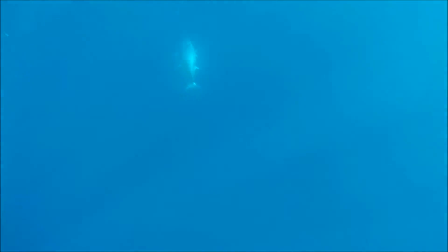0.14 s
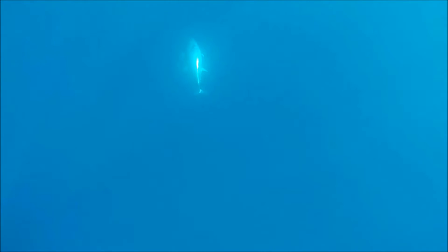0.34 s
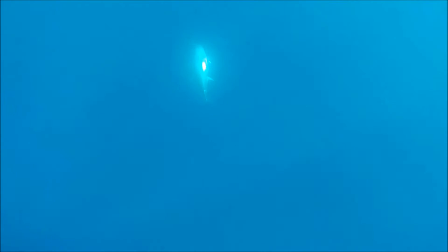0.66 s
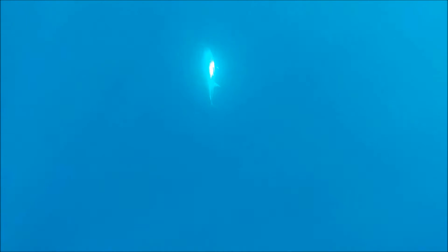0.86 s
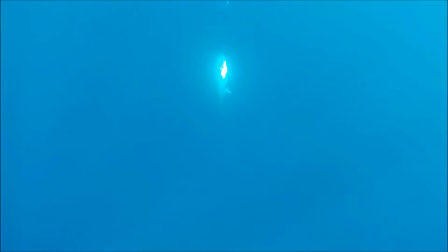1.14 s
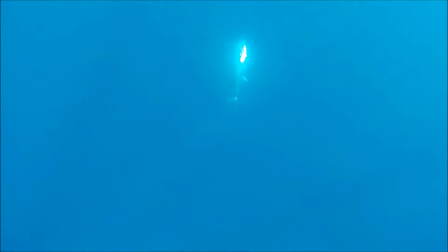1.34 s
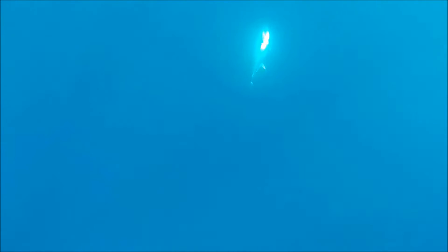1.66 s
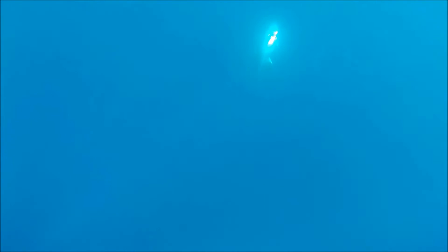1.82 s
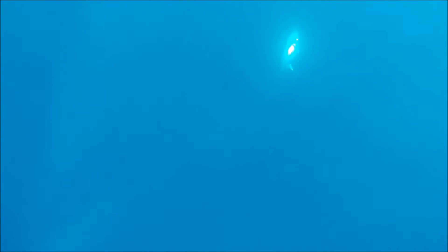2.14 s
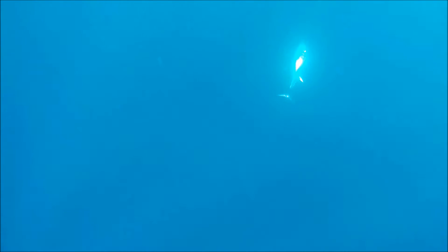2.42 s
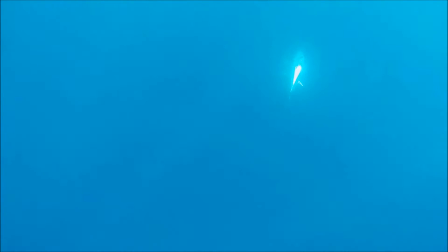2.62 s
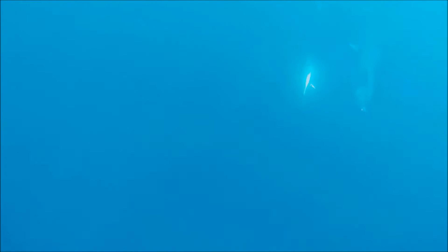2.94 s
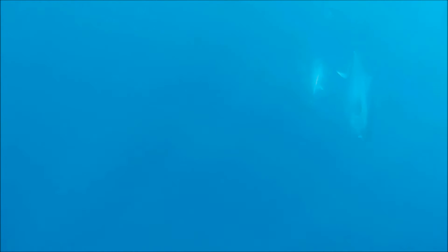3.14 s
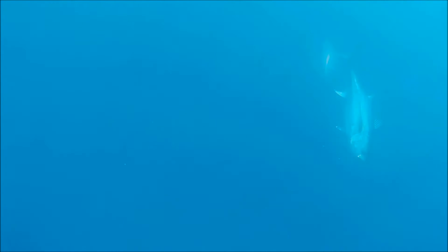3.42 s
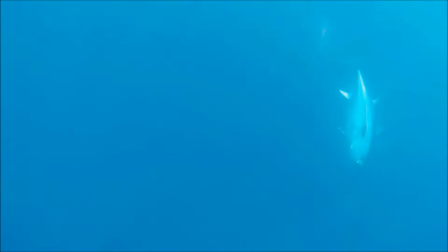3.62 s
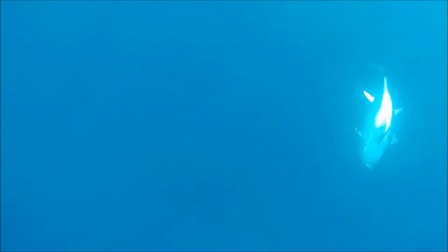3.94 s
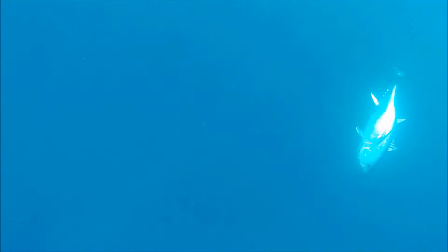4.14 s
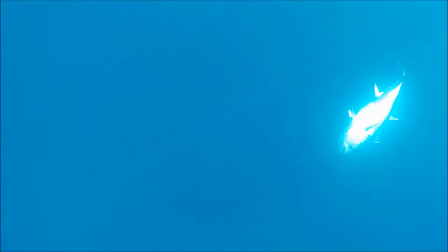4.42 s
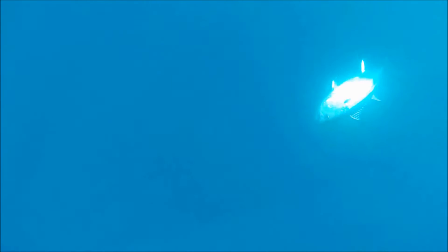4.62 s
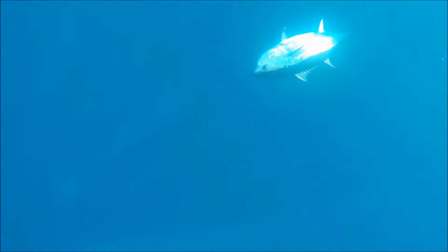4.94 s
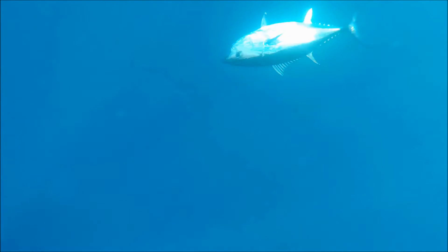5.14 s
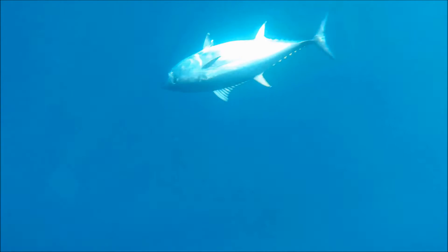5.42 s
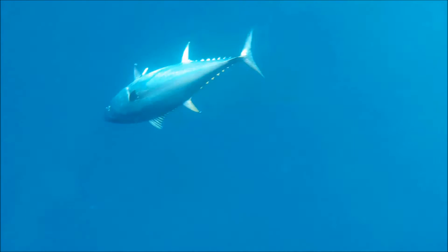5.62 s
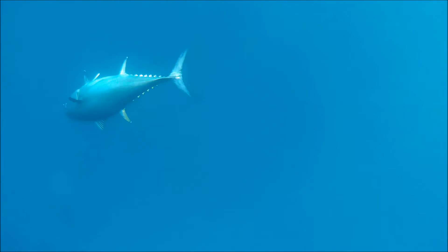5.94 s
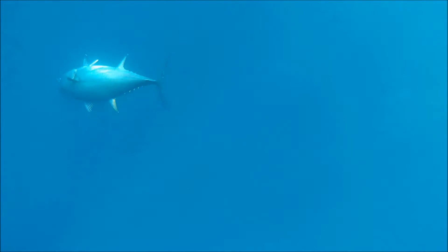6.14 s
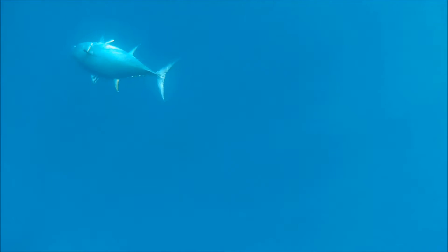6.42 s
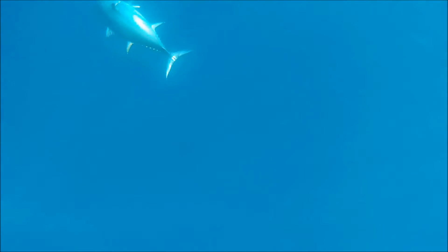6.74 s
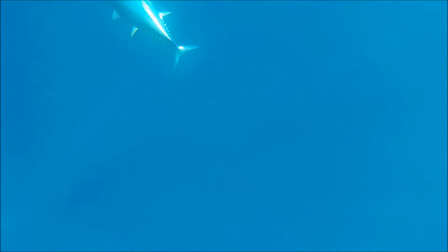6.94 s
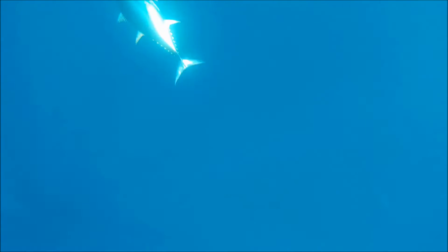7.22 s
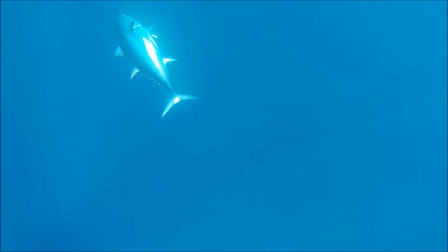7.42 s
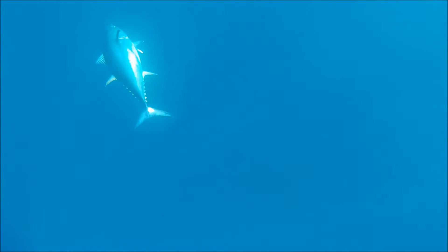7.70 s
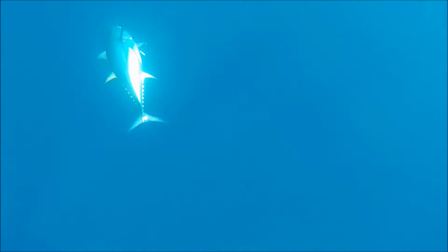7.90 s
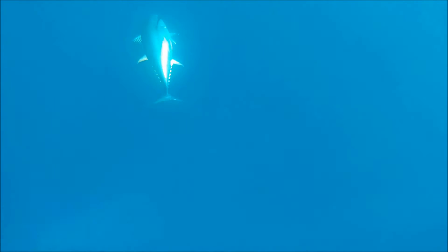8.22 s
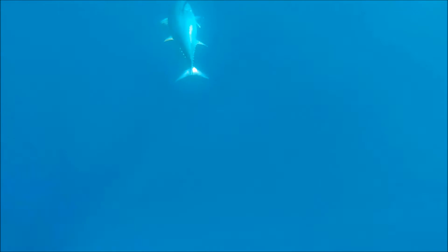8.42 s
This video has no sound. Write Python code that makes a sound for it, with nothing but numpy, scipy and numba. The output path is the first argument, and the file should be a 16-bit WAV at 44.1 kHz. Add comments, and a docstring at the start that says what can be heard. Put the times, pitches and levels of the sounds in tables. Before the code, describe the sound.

Just under the sea surface, water rumbles and sloshes softly over a faint hiss, muffled by a sealed camera housing. Droplets tick on the shell and small bubbles plop. The hiss grows a little, and a hard, dull knock strikes the housing. After a lull, the bubbles and ticks return and thicken into a burst of churning water with two more knocks.

```python
"""A sealed camera hangs just under the sea surface beside a boat; all sound comes through its housing.
Water rumbles and sloshes throughout, over microphone hiss. From 0.6 s droplets tick on the shell,
bubbles plop and glide up, and dull knocks ring the housing. The hiss is louder from 2.5 to 4 s, with
the hardest knock at 3.7 s. After a lull, bubbles and ticks return at 6.2 s and peak with the churning
water and two more knocks near 8 s."""
import sys
import numpy as np
from scipy import signal
from scipy.io import wavfile
from scipy.ndimage import uniform_filter1d
from numba import njit

SR = 44100
rng = np.random.default_rng(int(sys.argv[2]) if len(sys.argv) > 2 else 0)


def generate_wav(sig):
    """Save sig (samples, or channels by samples) to the path in sys.argv[1] as 16-bit PCM at SR."""
    pcm = np.round(np.clip(np.atleast_2d(sig).T, -1, 1) * 32767).astype(np.int16)
    wavfile.write(sys.argv[1], SR, pcm)


N = 377937

# water movement: (time [s], surge [dB], flow along the shell [dB], churn [dB])
WATER_LEVELS = [(0.0, -65.5, -65, -61.5), (0.43, -59, -64.5, -63), (0.86, -58, -60.5, -59.5),
                (1.07, -56, -60.5, -56.5), (1.81, -58, -58.5, -55), (2.03, -58.5, -62.5, -61.5),
                (2.34, -63, -61.5, -64), (2.58, -60, -58.5, -64.5), (3.1, -61.5, -62.5, -67),
                (3.79, -57, -59, -61), (4.13, -65, -64, -72), (4.84, -66, -65.5, -70),
                (5.8, -62, -66, -70.5), (6, -54, -63, -64), (6.18, -53.5, -65, -61.5),
                (6.37, -57, -55, -74), (6.54, -60, -58.5, -60.5), (6.9, -61, -57.5, -61),
                (7.23, -58, -54.5, -57), (7.57, -50.5, -51.5, -49), (7.9, -47.5, -55.5, -36.5),
                (8.04, -48.5, -55.5, -49.5), (8.28, -51.5, -53, -49), (8.57, -50, -51, -60)]
# rumble spectrum: (frequency [Hz], relative gain [dB])
RUMBLE_SPECTRUM = [(11, -28), (18, 0.5), (50, -5), (110, -10.5), (190, -10), (273, -10.5), (368, -16.5),
                   (396, -5.5), (467, -15.5), (729, -25), (1500, -31.5), (1950, -55), (3300, -120)]
# air space behind the window: (frequency [Hz], base width [Hz], gain [dB])
AIR_MODES = [(676, 302, 3.5), (950, 120, -10.5), (1577, 450, -17.5), (2175, 1170, -23), (2974, 27, -23)]
# microphone hiss: (time [s], level [dB])
HISS_LEVELS = [(0, -67.5), (2.52, -68), (2.55, -63.5), (4.04, -64.5), (4.08, -68), (8.57, -68)]
# droplets on the shell: (time [s], level [dB], own note [Hz], brightness [dB])
DROPLETS = [(0.614, -51, 2400, -9), (0.772, -47, 2600, -12), (.815, -50.5, 2700, 0.5),
            (.823, -57, 2600, 1.5), (0.911, -52, 2540, -11), (.958, -61, 4470, -3), (.977, -54, 2760, 1),
            (.984, -56, 5100, 0), (1.01, -60.5, 4900, 0), (1.173, -52, 2410, -1), (1.278, -56, 2340, -10),
            (1.481, -56.5, 3130, -12), (1.679, -51, 3420, -8), (1.905, -58, 3100, -12),
            (1.917, -58, 2800, -12), (2.069, -57, 2950, -8), (3.392, -44.5, 2820, -21),
            (3.466, -55, 2680, -3), (6.18, -59, 3300, -14), (6.387, -56, 5240, 1), (6.43, -59, 2350, -12),
            (6.46, -63, 2700, -12), (6.472, -49, 2270, -16), (6.503, -63, 2700, -12),
            (6.513, -50, 2350, -12), (6.59, -47.5, 2630, -22), (6.642, -57, 2650, -12),
            (6.716, -56, 3480, -14), (6.758, -49.5, 2830, -13), (6.79, -57, 5400, -10),
            (7.179, -59, 2850, -2), (7.273, -55, 4670, 2), (7.298, -47, 2670, 2), (7.311, -45, 4670, -9),
            (7.319, -47, 4650, -3), (7.326, -46, 2770, 1), (7.348, -39.5, 4210, -1.5),
            (7.353, -44, 7760, 0), (7.36, -42, 2750, -6.5), (7.369, -43, 2720, -1), (7.379, -56, 5300, 0),
            (7.386, -52, 4540, -1), (7.42, -50.5, 8100, 2), (7.425, -50, 5000, -2), (7.431, -53, 4670, -2),
            (7.471, -65, 6300, -10), (7.477, -55, 4540, -4), (7.484, -60, 4500, -6), (7.49, -52, 4530, -8),
            (7.508, -44, 3720, -5), (7.526, -61, 6700, -1), (7.542, -57, 4500, -8), (7.547, -53, 3400, -6),
            (7.561, -48.5, 2630, 2), (7.574, -58, 4700, -6), (7.586, -53, 3700, -6), (7.598, -52, 2800, -4),
            (7.605, -39, 2630, 3), (7.636, -53, 2230, -3), (7.647, -49, 3800, -1),
            (7.654, -37.5, 2630, 0.5), (7.667, -35.5, 3040, -12), (7.671, -36.5, 2300, -19),
            (7.7, -53, 2800, -8), (7.715, -60, 2900, -10), (7.735, -51, 2700, -17), (7.765, -41, 2300, -5),
            (7.767, -44, 3100, -10), (7.823, -39.5, 2630, 3.5), (7.829, -41, 6370, -3),
            (7.88, -57, 2700, -3), (7.913, -51, 2750, -12), (7.925, -45, 2930, -11),
            (7.939, -48, 3100, -12), (7.944, -47, 2400, -12), (7.963, -50, 2900, -19),
            (7.985, -47, 2400, -17), (8.0, -39.5, 2410, -21), (8.087, -50, 2820, -10),
            (8.091, -51.5, 2060, -1.5), (8.127, -48, 2300, -14), (8.165, -49, 2720, -8),
            (8.171, -47, 3480, -8), (8.18, -51, 2780, -12), (8.256, -54, 4100, -4), (8.312, -46, 2700, -21),
            (8.343, -46, 2850, -16), (8.39, -49, 2380, -8)]
# stiff shell modes: (frequency [Hz], width [Hz], gain [dB])
SHELL_MODES = [(2750, 880, 1), (4400, 1140, 6.5), (7480, 540, -7), (9480, 560, -10.5), (1660, 510, -3)]
# bubbles: (time [s], level [dB], pitch [Hz], t60 [s], splutter re level [dB])
BUBBLE_EVENTS = [(.89, -50, 1154, .015, -12), (.978, -37, 740, 0.019, -6.5), (1.07, -28, 741, 0.033, -27),
                 (1.185, -43.5, 752, 0.032, -2.5), (1.21, -54, 1440, .035, -10),
                 (1.334, -51, 970, 0.035, -17), (1.353, -35.5, 1060, 0.034, -15),
                 (1.41, -43, 1550, 0.021, -12), (1.515, -48, 1270, 0.033, -10),
                 (1.519, -46.5, 627, 0.036, 1.5), (1.534, -50, 1600, 0.023, -21),
                 (1.641, -36, 670, 0.022, -15), (1.642, -35, 990, 0.011, -19),
                 (1.642, -40, 1440, 0.011, -17), (1.678, -51.5, 1900, 0.019, -16),
                 (1.73, -54, 615, 0.099, -8), (1.798, -49.5, 601, 0.1, -16), (1.832, -39, 720, 0.031, -17),
                 (1.832, -37.5, 1530, 0.016, -18), (1.842, -48, 1590, 0.016, -13),
                 (1.877, -47.5, 1790, 0.014, -8), (1.88, -50.5, 683, 0.1, -1), (2.005, -52, 700, .018, -12),
                 (2.067, -45, 700, 0.015, -10), (3.224, -44, 623, 0.018, -15), (3.391, -47, 640, 0.02, -2),
                 (3.467, -42, 720, 0.021, -12), (3.716, -49, 1320, .02, 5), (3.73, -47, 640, .035, -8),
                 (3.737, -56, 1030, .02, -6), (3.782, -47, 704, 0.027, -11), (3.803, -55, 750, .02, -11),
                 (3.977, -54.5, 626, 0.031, 2), (5.391, -52.5, 1580, 0.013, -5.5),
                 (6.292, -41.5, 746, 0.035, -9), (6.369, -34, 970, 0.021, -19),
                 (6.377, -35, 790, 0.033, -22), (6.389, -39.5, 890, 0.042, -15),
                 (6.386, -42.5, 1350, 0.034, -13), (6.419, -53, 1850, .03, -1),
                 (6.428, -44, 1560, 0.02, -5), (6.435, -27, 655, 0.05, -22), (6.453, -39, 1356, 0.042, -13),
                 (6.471, -37.5, 1840, 0.028, -6), (6.479, -48, 1200, .02, -12),
                 (6.495, -45, 620, 0.049, -7), (6.499, -52, 1870, .03, -2), (6.514, -51, 1630, .028, -16),
                 (6.519, -42, 705, 0.043, -24), (6.59, -35, 950, 0.06, -10.5), (6.593, -47, 560, .05, -9),
                 (6.618, -50, 1590, 0.025, -4), (6.685, -49.5, 564, .07, -10),
                 (6.696, -46, 1094, 0.025, -8), (6.713, -47, 1090, 0.059, -8),
                 (6.714, -56, 1850, 0.027, -8), (6.757, -50.5, 1450, 0.015, -2),
                 (6.82, -50, 1280, 0.021, -1), (6.87, -46, 1125, 0.059, -8), (6.872, -47, 740, .03, -12),
                 (6.903, -49, 1100, 0.044, -10), (6.986, -42, 765, 0.061, -23),
                 (6.986, -40.5, 477, 0.033, -23), (7.015, -48, 570, 0.1, -7),
                 (7.069, -44.5, 514, 0.074, -22), (7.11, -49.5, 557, .07, -4),
                 (7.177, -34.5, 465, 0.07, -15), (7.222, -40, 496, 0.025, -8), (7.24, -45, 524, 0.047, -17),
                 (7.256, -41.5, 754, 0.043, -18), (7.311, -30, 643, 0.031, -9),
                 (7.346, -38.5, 1490, 0.02, -3), (7.574, -38.5, 690, 0.12, -3),
                 (7.624, -34.5, 700, .042, 2.5), (7.633, -26.5, 710, 0.043, -8.5),
                 (7.68, -42, 695, 0.032, -11), (7.698, -44, 720, .035, -11),
                 (7.734, -24.5, 1540, 0.012, -3.5), (7.733, -33, 600, .015, -7),
                 (7.722, -48.5, 1510, .03, 0), (7.741, -23, 534, 0.046, -27), (7.756, -40, 670, .05, -6),
                 (7.766, -31, 757, 0.066, -0.5), (7.782, -31, 762, 0.074, -7),
                 (7.803, -28, 603, 0.042, -4.5), (7.822, -30, 670, 0.035, -4.5),
                 (7.83, -30.5, 700, 0.063, -7), (7.844, -38, 1095, 0.033, -18),
                 (7.86, -31.5, 680, 0.042, -20), (7.879, -25, 730, 0.025, -22),
                 (7.889, -24.5, 656, 0.039, -16), (7.892, -32, 1290, 0.028, -3),
                 (7.91, -40, 680, 0.027, -2), (7.935, -34, 940, 0.029, -2), (7.966, -32, 618, 0.053, -16),
                 (7.969, -33.5, 1050, 0.032, -11), (7.997, -38, 1000, .039, -29),
                 (8.011, -19.5, 644, 0.035, -33), (8.03, -41, 1397, 0.023, -19),
                 (8.049, -36.5, 2310, 0.018, -21), (8.048, -27, 637, 0.041, -24),
                 (8.07, -25, 420, 0.058, -22), (8.072, -33, 1107, 0.04, -12),
                 (8.072, -46, 2840, 0.034, -25), (8.086, -30.5, 957, 0.04, -7.5),
                 (8.112, -37, 665, 0.064, -22), (8.117, -38, 1450, 0.02, -6), (8.124, -38, 1190, .03, -8),
                 (8.145, -23.5, 740, 0.021, -25), (8.153, -38, 750, 0.041, -17),
                 (8.164, -38.5, 1190, 0.021, 0), (8.169, -27, 670, 0.043, -15),
                 (8.209, -35.5, 740, 0.024, -13), (8.21, -47, 1780, .025, -12),
                 (8.253, -37.5, 400, .025, -18), (8.254, -35.5, 1100, 0.023, -7),
                 (8.308, -34, 950, 0.023, -4.5), (8.309, -40.5, 1810, .015, -11),
                 (8.354, -43, 990, 0.023, 3), (8.433, -44, 1380, 0.038, 2.5), (8.476, -46, 637, .045, -7),
                 (8.524, -46.5, 584, 0.12, -26)]
# blows on the housing: (time [s], tap [dB], body [dB], boom [dB])
BLOWS = [(0.976, -55, -52, -65), (1.071, -49, -47.5, -73), (2.426, -39, -43.5, -61), (2.559, -54, -61, -47),
         (3.673, -18.5, -34, -24), (7.741, -34, -38.5, -62), (8.0704, -21.5, -44, -70)]
# tap, body, boom, upper body: (frequency [Hz], t60 [s], swell [s], gain [dB])
BLOW_MODES = [(610, 0.0089, 0.00087, 18), (223, 0.082, 0.00064, 10), (96.5, 0.061, 0.0016, 9.5),
              (385, 0.029, 0.0016, 6.5)]
# noise tails, one list per blow mode: (frequency [Hz], width [Hz], gain [dB])
BLOW_TAILS = [
    [(578, 48, -25), (810, 690, -36.5), (2000, 2000, -48)],
    [(228, 55, -20), (160, 70, -10.5), (348, 160, -19)],
    [(89, 45, -14.5)],
    [],
]

FIZZ_DB = -9  # re churn
WINDOW_HZ, WINDOW_WIDTH_HZ = 579, 13.6  # the window's own note
SPRAY_TAU_S, SPRAY_DB, SPRAY_HZ, SPRAY_WIDTH_HZ = 0.0023, 0.5, 4460, 4100
SPRAY_TAIL_TAU_S, SPRAY_TAIL_DB = 0.012, -8.5
BUBBLE_RISE, SPLUTTER_DB = 0.083, 2
WAKE_TAU_S, WAKE_SLOSH_DB, WAKE_FIZZ_DB, WAKE_THUD_DB = 0.018, -4.5, -11, -12.5
KNOCK_TOP_HZ = 890  # a soft blow wakes little above this
KNOCK_LAGS_S = -.0003, .0014, .0015, .0005  # lows come late
KNOCK_SIGNS = -1, -1, -1, 1  # tap, body and boom swing inward first


def undb(db):
    return 10 ** (np.asarray(db) / 20)


def unit(x):
    return x / np.sqrt(np.mean(x ** 2))


def noise():
    return rng.standard_normal(N)


def band(x, hz, width_hz):
    """Resonance, gain 1 at the centre."""
    return signal.lfilter(*signal.iirpeak(hz, hz / width_hz, fs=SR), x)


def steep(x, hz, width_hz):
    """The resonance twice: steeper skirts."""
    return band(band(x, hz, width_hz), hz, width_hz)


def walk(rate_hz):
    """Random steps, smoothed twice; spread near 1."""
    span = int(SR / rate_hz)
    steps = np.repeat(rng.standard_normal(N // span + 1), span)
    return 1.3 * uniform_filter1d(uniform_filter1d(steps, span), span)[:N]


def fading(time_s, db, tau_s):
    """Envelope: a jump at each time, then exponential decay."""
    jumps = np.zeros(N)
    np.add.at(jumps, (time_s * SR).astype(int), undb(db))
    return signal.lfilter([1], [1, -np.exp(-1 / (tau_s * SR))], jumps)


@njit
def sum_rings(time_s, gain, hz, t60_s, rise, attack_s, hold):
    """Sample loop of ring()."""
    out = np.zeros(N)
    for k in range(len(time_s)):
        start, phase = int(time_s[k] * SR), 0.
        for j in range(min(int(t60_s[k] * SR), N - start)):
            age = j / (t60_s[k] * SR)
            phase += 2 * np.pi * hz[k] * (1 + rise[k] * (2 * age - .3)) / SR
            swell = (1 - np.exp(-j / (attack_s * SR))) ** 2
            out[start + j] += gain[k] * np.sin(phase) * np.exp(-6.9 * age ** hold) * swell
    return out


def ring(time_s, db, hz, t60_s, attack_s, rise=0, hold=1):
    """Damped sines gliding up by 2 * rise * hz; hold > 1 keeps them full longer."""
    columns = np.broadcast_arrays(time_s, db, hz, t60_s, rise)
    time_s, db, hz, t60_s, rise = (np.array(column, float) for column in columns)
    return sum_rings(time_s, undb(db), hz, np.clip(t60_s, .004, .5), rise, attack_s, float(hold))


def rumble(surge, flow):
    """Water pushes along the shell: surges below 80 Hz, flow above; each half-octave wavers alone."""
    points_hz, points_db = np.transpose(RUMBLE_SPECTRUM)
    layers = [0, 0]
    for hz in 30 * 2 ** np.arange(0, 5.6, .5):
        gain_db = np.interp(np.log(hz), np.log(points_hz), points_db) + 2.17 * walk(4.4)
        layers[int(hz > 80)] += undb(gain_db) * steep(noise(), hz, hz / 1.5)
    return unit(layers[0]) * surge + unit(layers[1]) * flow


def housing(x, widen):
    """The air space behind the window rings when struck: (lower modes, upper modes)."""
    muffled = signal.sosfilt(signal.butter(4, 3400, fs=SR, output="sos"), x)
    modes = [undb(db) * steep(muffled, hz, widen * width_hz) for hz, width_hz, db in AIR_MODES]
    return sum(modes[:2]), sum(modes[2:])


def swarm(low_hz, high_hz, cycles, spread_db, count):
    """A crowd of unequal bubbles ringing at random times."""
    when, pitch, level = rng.random((count, 3)).T
    hz = low_hz * (high_hz / low_hz) ** pitch
    return unit(ring(when * N / SR, spread_db * level, hz, cycles / hz, attack_s=0.0011, rise=0.17))


def slosh(churn, fizz):
    """Moving water: crackling wash through the housing, plus bubble crowds."""
    bursts = undb(8.7 * rng.random(N)) * (rng.random(N) < .002)  # about 90 per second
    crackle = 2.0 + unit(uniform_filter1d(bursts, size=180))
    wash_low, wash_high = housing(noise() * crackle * undb(1.5 * walk(30)), widen=1.38)
    large = swarm(452, 900, cycles=14, spread_db=18, count=3000)
    small = swarm(960, 1855, cycles=12, spread_db=9.5, count=5000)
    tiny = swarm(2300, 3330, cycles=22, spread_db=27, count=1800)
    sizzle = unit(steep(noise() * crackle, 2830, 420))  # first shell mode, kept going
    patter = swarm(3870, 5500, cycles=27, spread_db=30, count=600)
    trickle = unit(steep(noise() * crackle, WINDOW_HZ, 90))
    lows = undb(-12) * trickle + undb(-4) * unit(wash_low) + undb(-19) * large
    highs = (undb(-5.5) * unit(wash_high) + undb(-3.5) * small + undb(-21.5) * tiny
             + undb(-18) * sizzle + undb(-25) * patter)
    return churn * lows + fizz * highs


def microphone_hiss(t_s):
    """White self-noise, slightly wavering."""
    return noise() * undb(np.interp(t_s, *np.transpose(HISS_LEVELS)) + 0.29 * walk(8.9))


def droplet_ticks():
    """A droplet rings its own note and the shell modes; brighter ones spray more."""
    time_s, db, hz, bright_db = np.transpose(DROPLETS)
    out = ring(time_s, db, hz, t60_s=0.018, attack_s=0.00045, hold=1.12)
    for k, (mode_hz, width_hz, mode_db) in enumerate(SHELL_MODES):
        level_scatter, pitch_scatter = rng.standard_normal((len(time_s), 2)).T
        ring_db = db + mode_db + (k > 0) * bright_db + 3.8 * level_scatter
        ring_hz = mode_hz * (1 + 0.047 * pitch_scatter)
        out += ring(time_s, ring_db, ring_hz, t60_s=4.8 / width_hz, attack_s=0.00031)
    spray = uniform_filter1d(fading(time_s, db + bright_db + SPRAY_DB, SPRAY_TAU_S), size=60) * noise()
    tail = fading(time_s, db + bright_db + SPRAY_TAIL_DB, SPRAY_TAIL_TAU_S) * noise()
    return out + steep(tail, SHELL_MODES[1][0], 1300) + steep(spray, SPRAY_HZ, SPRAY_WIDTH_HZ)


def bubbles():
    """A bubble splutters at pinch-off, rings at the pitch of its size and rises; the window hums on."""
    time_s, db, hz, t60_s, splutter_db = np.transpose(BUBBLE_EVENTS)
    note = ring(time_s, db, hz, t60_s, attack_s=0.001, rise=BUBBLE_RISE, hold=1.61)
    note *= 1 + 0.28 * walk(400)  # gurgle
    pinch_off = fading(time_s, db + splutter_db, tau_s=0.0037) * noise()
    splutter = sum(housing(pinch_off, widen=2.1))
    window_hum = band(note, WINDOW_HZ, WINDOW_WIDTH_HZ)
    return note + undb(SPLUTTER_DB) * splutter + undb(-1.5) * window_hum


def bubble_wake():
    """Envelope of the stir each splutter leaves in the water."""
    time_s, db, *_, splutter_db = np.transpose(BUBBLE_EVENTS)
    return uniform_filter1d(fading(time_s, db + splutter_db, WAKE_TAU_S), size=300)


def knocks():
    """A soft blow: quick tap, then body and boom, with diffuse tails as the housing settles."""
    time_s, tap_db, body_db, boom_db = np.transpose(BLOWS)
    levels_db = tap_db, body_db, boom_db, body_db
    soft = signal.butter(4, KNOCK_TOP_HZ, fs=SR, output="sos")
    out = np.zeros(N)
    for mode, lag_s, sign, db, tails in zip(BLOW_MODES, KNOCK_LAGS_S, KNOCK_SIGNS, levels_db, BLOW_TAILS):
        hz, t60_s, swell_s, mode_db = mode
        out += sign * signal.sosfilt(soft, ring(time_s + lag_s, db + mode_db, hz, t60_s, swell_s))
        fade = uniform_filter1d(fading(time_s, db, tau_s=0.066), size=400, origin=199)
        for tail_hz, width_hz, tail_db in tails:
            out += fade * undb(tail_db) * unit(steep(noise(), tail_hz, width_hz))
    return out


def scene():
    """All sources at one microphone, fed to both channels."""
    t_s = np.arange(N) / SR
    points_s, *levels_db = np.transpose(WATER_LEVELS)
    surge, flow, churn = (undb(np.interp(t_s, points_s, db)) for db in levels_db)
    wake = bubble_wake()
    stirred_churn = np.hypot(churn, undb(WAKE_SLOSH_DB) * wake)
    stirred_fizz = np.hypot(churn * undb(FIZZ_DB), undb(WAKE_FIZZ_DB) * wake)
    water = rumble(surge * undb(walk(4.5)), flow)
    water += undb(WAKE_THUD_DB) * wake * unit(steep(noise(), hz=270, width_hz=340))
    water += slosh(stirred_churn, stirred_fizz)
    sea = water + microphone_hiss(t_s) + bubbles() + droplet_ticks() + knocks()
    return np.array([sea, sea])


def record(dry):
    """The microphone misses the deepest surges; the recorder cuts the top."""
    low_cut = signal.butter(2, 32, "high", fs=SR, output="sos")
    top_cut = signal.ellip(10, .2, 60, 15580, fs=SR, output="sos")
    return signal.sosfilt(top_cut, signal.sosfilt(low_cut, dry))


dry = scene()
out = record(dry)
generate_wav(out)
```